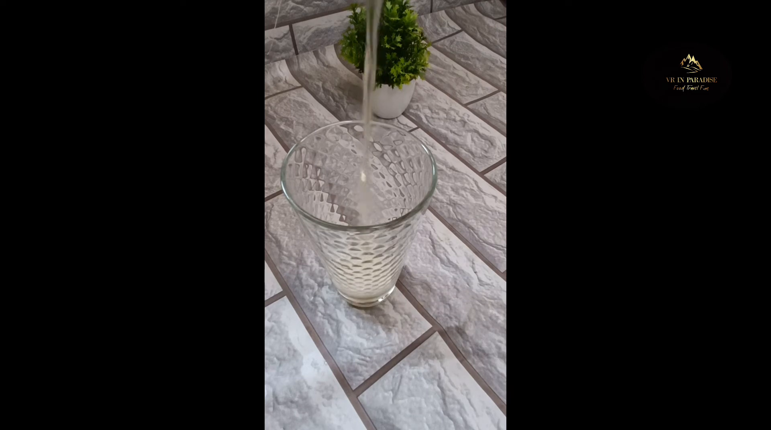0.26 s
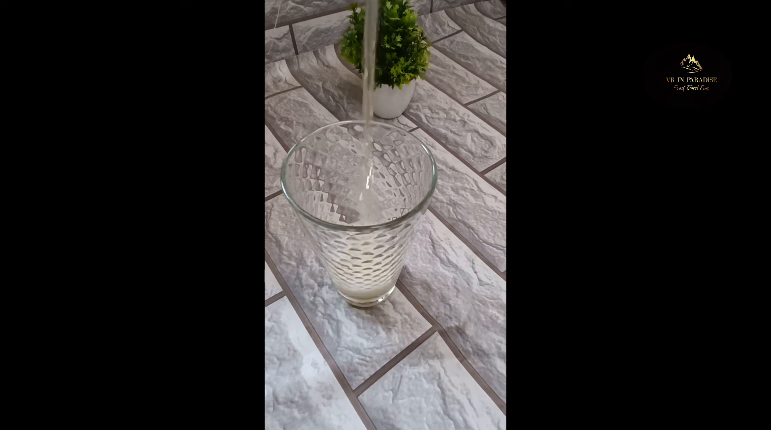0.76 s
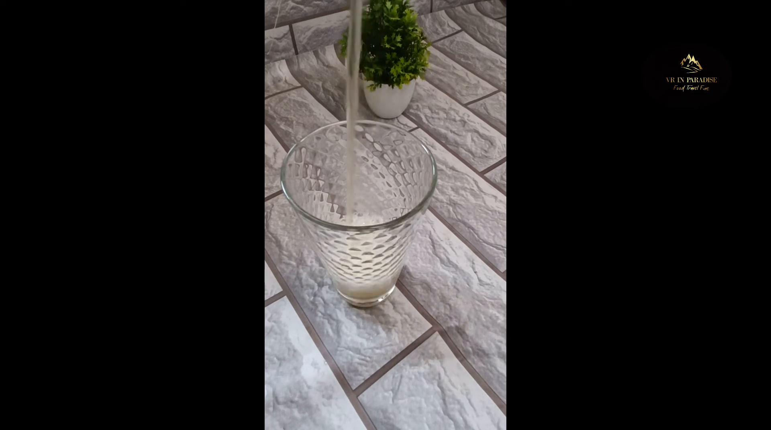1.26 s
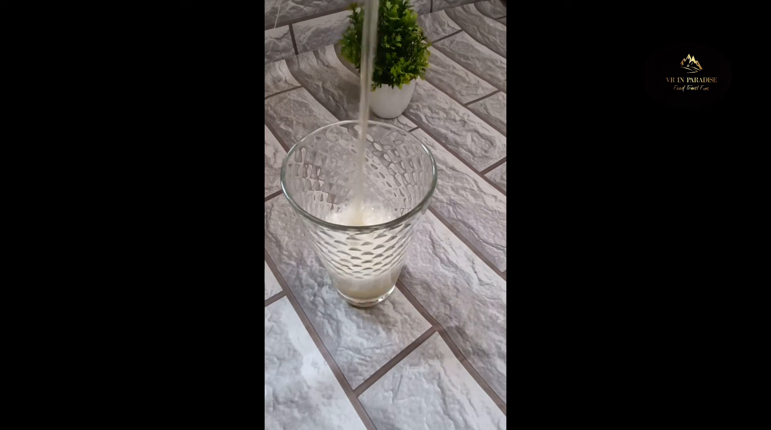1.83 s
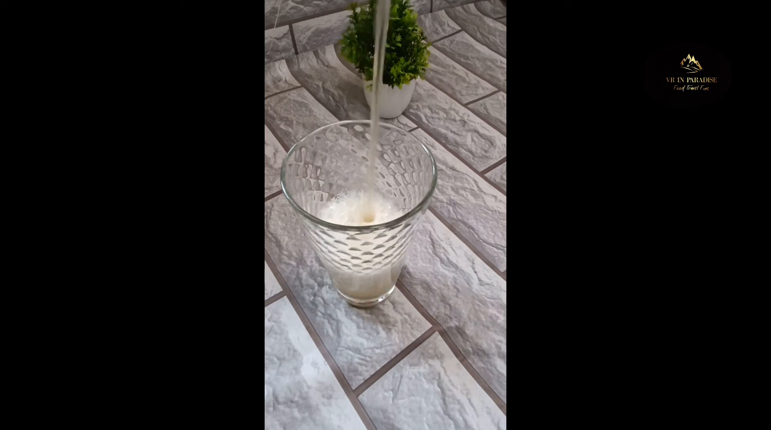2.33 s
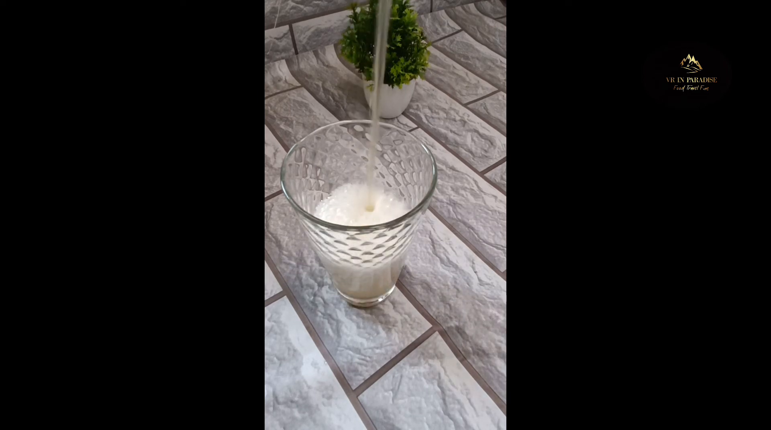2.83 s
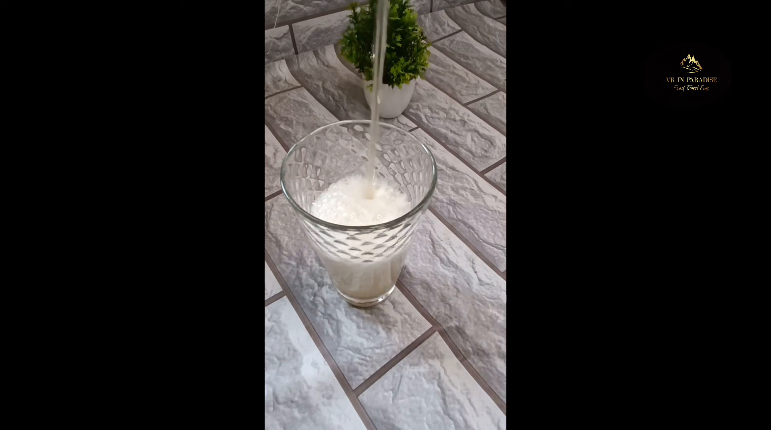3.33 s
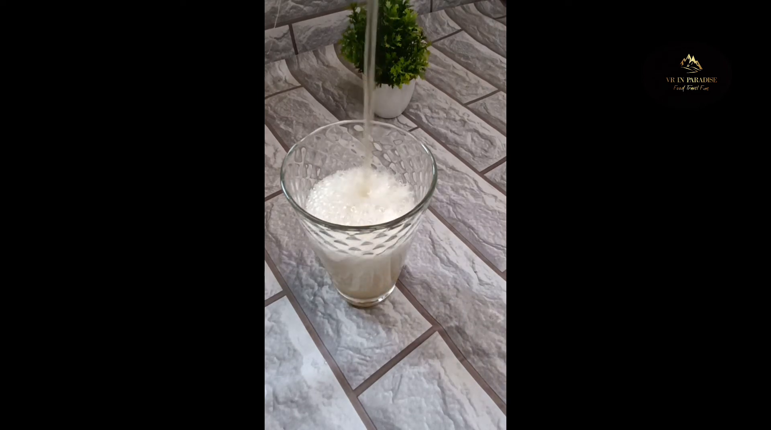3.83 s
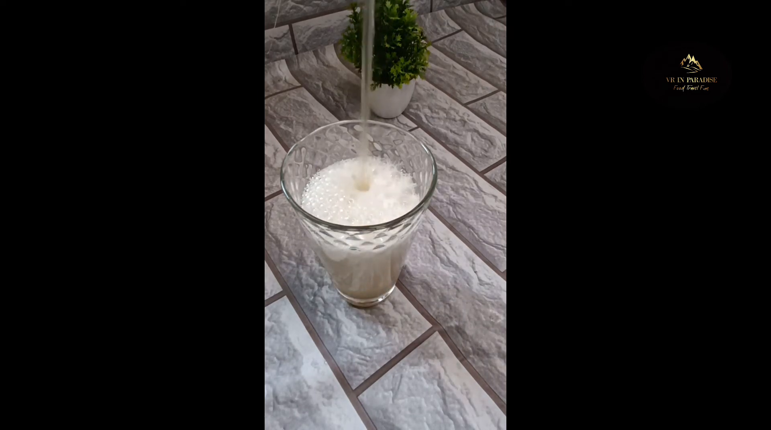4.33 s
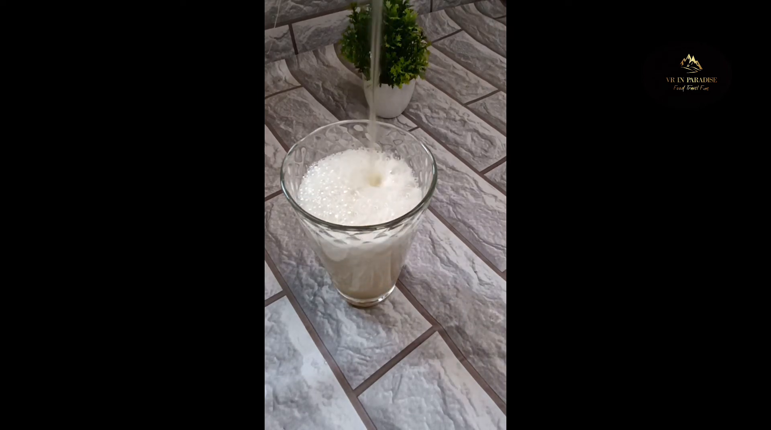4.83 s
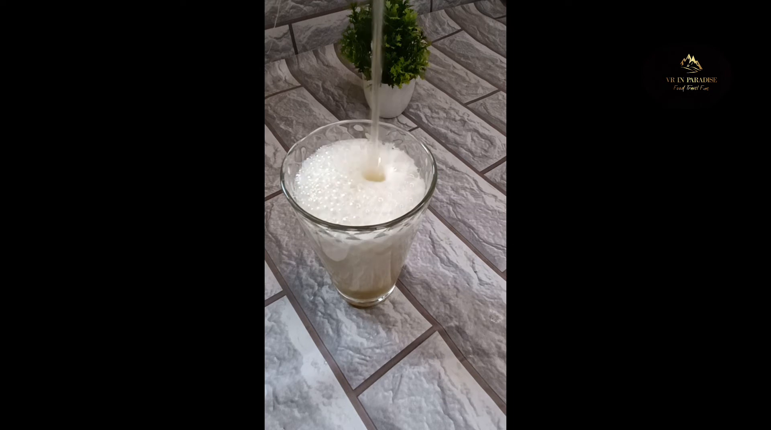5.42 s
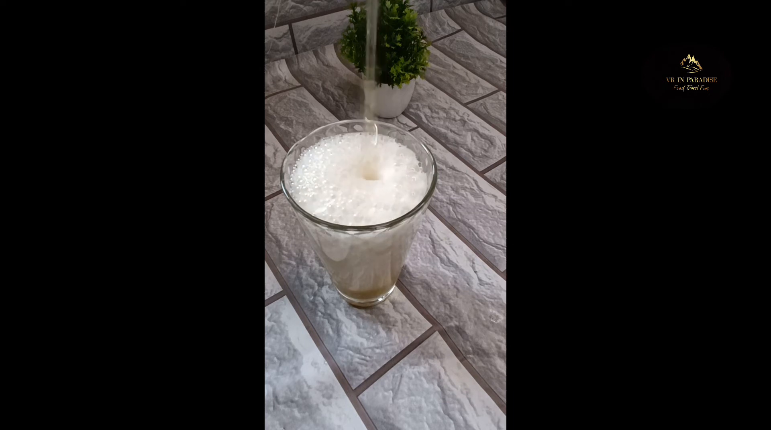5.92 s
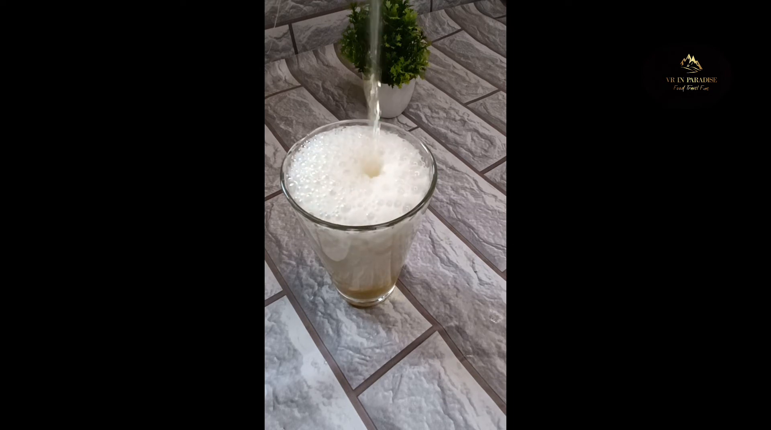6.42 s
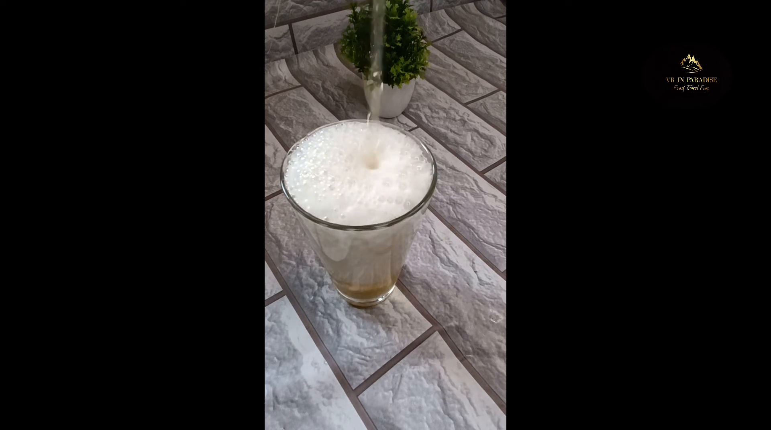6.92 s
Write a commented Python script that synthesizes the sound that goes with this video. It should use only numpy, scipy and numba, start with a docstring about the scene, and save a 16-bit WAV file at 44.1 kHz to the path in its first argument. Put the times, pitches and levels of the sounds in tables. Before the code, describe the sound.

Close phone pickup in a small tiled room: a fizzy drink splashes into a glass, loudest at the start with dense resonant slaps and bright droplets. Over several seconds the hollow tone climbs and blurs, bubbles plink upward, and the spray dulls. After about four seconds foam cushions the stream, so only sparse, quiet plops and a faint dribble remain above low rumble.

```python
"""Wet slaps of a fizzy drink ring out from a glass on a tiled counter, close to a phone with two microphone ports.
Slugs of the broken stream slap the surface and ring the air above it, which climbs for most of the pour;
thuds excite a bubbly liquid that mostly sinks in pitch, and trapped bubbles plink with a rising pitch.
Noise puffs make splash and ticking spray, the growing foam muffles it all, and a faint room rumble lies under."""
import sys
import numpy as np
from scipy import signal
from scipy.fft import rfft, irfft, next_fast_len
from scipy.io import wavfile
from scipy.ndimage import uniform_filter1d, map_coordinates
from numba import njit

SR = 44100
rng = np.random.default_rng(int(sys.argv[2]) if len(sys.argv) > 2 else 0)


def transcribe(u):
    """Save the signal u as a 16-bit wav file named by the first command-line argument.

    u: samples, shape (n,) or (channels, n), limited to [-1, 1]; the rate is SR.
    q: integer samples, one column per channel.
    """
    v = np.clip(np.atleast_2d(u).T, -1, 1)
    q = np.round(v * 32767).astype(np.int16)
    wavfile.write(sys.argv[1], SR, q)


N = 315756

# room noise colour: pitch_hz, level_db
RUMBLE = [(20, -7.5), (48, -21.5), (65, 0.5), (110, -7), (185, -9.5), (285, -20), (330, -11), (470, -24),
          (630, -28), (1100, -22.5), (2500, -26.5), (7000, -44.5), (9000, -30), (16000, -59.5)]
# decay of the tiled room: pitch_hz, t60_s
ROOM = [(200, 0.11), (1500, 0.23), (10000, 0.015)]
# far port against near port, shaded by the phone and the counter: pitch_hz, level_db, phase_radians
FAR = [(100, -2, .1), (520, 0, -.2), (650, 4.5, -.8), (830, -9, -3), (1000, -14, -6), (1150, -12, -9),
       (1450, -2, -12.2), (1750, -6, -12.5), (2000, -2, -12.5), (2300, -8, -13), (2700, -3, -12.7),
       (3200, -10, -12.6), (5200, -7, -12.4), (7000, 7, -12.9), (8500, -5, -12.8), (9300, -15, -13.4),
       (10200, -26, -14), (12000, -10, -13), (16000, 2, -13)]
# dips and lifts at the near port, from the counter's echo: pitch_hz, level_db
NEAR = [(60, -0.5), (150, -4.5), (480, 6.5), (630, 6.5), (850, 4), (1750, 0.5), (1950, -9), (2300, -2.5),
        (2900, -10.5)]
# thin steady stream under the gushes: time_s, patter_db, thud_db, spray_db
STREAM = [(0, -34, -61, -36.5), (.1, -40.5, -59.5, -39.5), (.4, -46.5, -54.5, -43.5), (.8, -43, -48, -40.5),
          (1.1, -43.5, -48, -47.5), (1.45, -48.5, -52.5, -49.5), (2.3, -51, -51.5, -59.5),
          (2.8, -53, -63.5, -65), (3.5, -52.5, -56.5, -54.5), (3.84, -62.5, -69.5, -72),
          (4.22, -73.5, -82, -79.5), (4.45, -67.5, -83.5, -76.5), (4.9, -61.5, -68.5, -66),
          (5.7, -68.5, -76, -72.5), (6.2, -70, -75.5, -72.5), (7.16, -66.5, -71.5, -62.5)]
# a thicker stretch of the stream lands: start_s, length_s (until it drains), lift_db
GUSHES = [(1.352, 0.013, 10), (2.109, 0.061, 6.5), (2.382, 0.18, 5), (2.719, 0.045, 7.5), (2.881, 0.13, 11),
          (3.586, 0.15, 5.5), (3.671, 0.12, 6), (3.856, 0.068, 15), (3.979, 0.043, 6), (4.045, 0.12, 13),
          (4.263, 0.045, 9), (4.327, 0.011, 19.5), (4.474, 0.13, 8), (4.658, 0.045, 10.5),
          (4.756, 0.032, 10), (5.545, 0.06, 8), (5.753, 0.11, 8.5), (6.193, 0.053, 7.5),
          (6.344, 0.069, 5.5), (6.703, 0.035, 8.5), (6.934, 0.032, 2)]
# the filling glass: time_s, air_hz, air_width_hz, liquid_hz, liquid_width_share (of liquid_hz), upper_air_db
FILL = [(0, 830, 99, 610, 0.067, -3.5), (.33, 860, 104, 600, 0.14, 4), (.5, 851, 109, 468, 0.32, 0.5),
        (1.1, 903, 143.3, 329, 0.25, -5), (1.6, 984, 153, 271, 0.26, -13.5),
        (2.2, 1000, 220, 197, 0.3, -11.5), (3, 1160, 428, 178, 0.96, -17), (4, 1544, 710, 183, 0.61, -33),
        (4.7, 2030, 1100, 164, 1.3, -37), (5.8, 2033, 1390, 203, 0.87, -22.5),
        (7.16, 1673, 1320, 190, 0.58, -2.5)]
# glass and counter shaken by the thuds: pitch_hz, width_hz, level_db
COUNTER = [(182.6, 13.6, 10), (250.3, 6.7, -0.5), (334.7, 8.8, 5.5), (450, 81, 1.5)]
# spray colour through the near port, which peaks in the treble: pitch_hz, level_db
SPRAY = [(2500, -27.5), (5000, -12.5), (7000, -23.5), (8300, -0.5), (9500, -0.5), (11000, -12),
         (12500, -15), (14500, -24), (15500, -37)]
# broad splash colour: pitch_hz, level_db
SPLASH = [(300, -22), (620, -21.5), (1000, 1.5), (1500, -2), (2250, -1), (3200, -2.5), (4300, -8),
          (5500, -21), (7000, -32.5), (9500, -14.5), (12500, -37.5), (16000, -64)]
# loud spray ticks: start_s, level_db, finest_droplets_db, biggest_droplets_db (last two against level_db)
TICKS = [(0.0235, -41.5, -6.5, -5), (0.073, -25.5, 1, -13), (0.145, -35.5, -9.5, -2.5),
         (0.165, -35, -15.5, 1), (0.4312, -25.5, -37, -1), (0.545, -36.5, -12, 3), (0.599, -35.5, -14, -2),
         (0.709, -37, -25, -5), (0.753, -42.5, -32.5, 3), (0.863, -40, -28, 3), (0.9322, -36, -31.5, -6.5),
         (0.9887, -36.5, -19.5, -14), (1.0154, -37, -27, -1), (1.1695, -37, -23.5, -17),
         (1.343, -39, -7, 7), (1.9208, -43, 4, -2), (2.1326, -38.5, -11, 12), (2.5429, -38.5, -30, 4),
         (2.852, -48.5, -10, 9.5), (2.918, -55, -5, -4), (2.94, -50.5, -4, 14), (3.014, -55, 1, 13),
         (3.158, -50.5, -11, 3), (3.851, -42.5, -29, -1), (4.058, -48, -7, -14),
         (4.1127, -43.5, -10.5, -15), (4.352, -51, 2.5, -1), (4.4984, -50.5, 0, -8),
         (4.6465, -51.5, -6.5, -3), (4.6817, -47.5, -3.5, -16), (6.011, -62.5, -20, 16.5),
         (6.4223, -55.5, -14, 7.5), (6.7252, -51.5, -7, 5), (6.9407, -53.5, -25, 4)]
# loud slaps: start_s, level_db, thud_db, splash_db (last two against level_db)
SLAPS = [(0.015, -26, -32, -36), (0.028, -14.5, -26, -49), (0.048, -16, -7, -55), (0.093, -20, -32, -40),
         (0.131, -20.5, -40, -34), (0.165, -19, -31, -16), (0.198, -19.5, -8.5, -22),
         (0.287, -25.5, -6, -36), (0.313, -28, -5, -33), (0.362, -25, -6, -44), (0.389, -29.5, -5, -35),
         (0.406, -29, -2, -21), (0.449, -19, -9, -22), (0.474, -26.5, -29, -35), (0.488, -18, -10, -47),
         (0.511, -22, -7.5, -27), (0.544, -23, -10.5, -19.5), (0.657, -19, -9, -50),
         (0.685, -25.5, -6, -10), (0.757, -29, -25, -37), (0.868, -33, -1, -33), (0.885, -24.5, -9.5, -26),
         (0.911, -23.5, -9, -31), (0.93, -40, -11, -15), (0.944, -27, -5.5, -18.5),
         (0.998, -24.5, -17, -27), (1.016, -26, -27, -23), (1.05, -27, -7, -19), (1.081, -25.5, 0, -15),
         (1.107, -22.5, -4.5, -22.5), (1.191, -24, -6, -37), (1.227, -26.5, -24, -17.5),
         (1.288, -37, -15, -27), (1.31, -26.5, -13, -19.5), (1.348, -27, -7.5, -14), (1.376, -21, -35, -27),
         (1.421, -25, -13.5, -23.5), (1.491, -27, -7.5, -22), (1.531, -23.5, -39, -49),
         (1.645, -23, -15, -18), (1.705, -18.5, -40, -26.5), (1.741, -22.5, -19, -30),
         (1.772, -23, -19.5, -24.5), (1.836, -44, -25, -6.5), (1.893, -20, -28, -31.5),
         (1.953, -28, -28, -20.5), (1.977, -26.5, -8, -21), (2.029, -28, -9, -27), (2.069, -29.5, -25, -26),
         (2.131, -27, -34, -15.5), (2.171, -23, -25, -38), (2.243, -24, -5, -63),
         (2.346, -38.5, 8.5, -11.5), (2.429, -29, -36, -18), (2.453, -31, -25, -17.5),
         (2.499, -20, -17, -24.5), (2.751, -35, -48, -11.5), (2.768, -24, -14.5, -39),
         (2.853, -45.5, -25, -8.5), (2.883, -32, -30, -28), (2.905, -30, -23, -27), (2.942, -31, -25, -15),
         (2.984, -21, -50, -24), (3.055, -33, -6.5, -34), (3.125, -28.5, -34, -24),
         (3.221, -28.5, -43, -19), (3.228, -29, -42, -19), (3.244, -28.5, -38, -20.5),
         (3.319, -37.5, -1, -12.5), (3.373, -22, -65, -59), (3.403, -31, -51, -19), (3.554, -43, -24, -15),
         (3.568, -35.5, -20, -18.5), (3.636, -39.5, -2, -15), (3.69, -25.5, -27, -19.5),
         (3.724, -27, -11.5, -27), (3.849, -35, -14, -12.5), (3.854, -33.5, -21, -30),
         (3.899, -25, -37, -35), (3.925, -58, -35, -38), (3.935, -39, -28, -16.5),
         (3.987, -27.5, -21.5, -26.5), (4.091, -49.5, -46, -40), (4.142, -36, -18, -26),
         (4.35, -48, -44, -16.5), (4.498, -31.5, -30, -36), (4.527, -39.5, -19, -22), (4.53, -53, -25, -17),
         (4.553, -50, -2, -14), (4.622, -49.5, -1, -16), (4.681, -30, -22.5, -24), (4.696, -48, -30, -33),
         (4.782, -45.5, -3, -11.5), (4.811, -49, -6, -19), (4.915, -53.5, 0, -13), (5.044, -37, -39, -21.5),
         (5.381, -32.5, -23, -40.5), (5.61, -38.5, -16.5, -27), (5.763, -50.5, -4, -18),
         (6.223, -40.5, -17, -25), (6.24, -48, -12, -15), (6.422, -47.5, -14, -29.5), (6.724, -51, -8, -18)]

LAG_S, TOP_HZ = 8 / SR, 16400  # far port's lag, on top of its phase; the phone's band limit
RUMBLE_TOP_DB, RUMBLE_KNEE_DB, RUMBLE_FOLLOWS = -60.5, -49, 0.5  # share of the patter's drop below the knee
GUSH_ATTACK_S, GUSH_FALL_DB_PER_S = 0.016, 284
THUD_FOLLOWS, SPRAY_FOLLOWS = 1, 1.49  # share of a gush's lift
THUD_LAG_S, SPRAY_FLOOR_DB = 0.008, -79.5  # the liquid answers a gush late; the foam never falls silent
SLUGS_PER_S, SLUG_JITTER = 85, .9  # the stream breaks up at a loose beat; jitter in beats
EVEN, UNEVEN_PER_S2 = .75, .02  # spread of slug sizes at the start, and its growth with time squared
TYPICAL_DB, SMALLEST_ODDS = 9, .07  # the size that keeps its level as the spread grows; bounds the sizes
SCATTER_DB, CHURN_DB = 7, -46.5  # spread in how well a slug rings the air; stirring under the slugs
BURST_DB = 21.5  # every slug throws a burst of spray and splash over the fine drizzle
BUBBLE_DB, BUBBLE_SCATTER = -11.5, .2  # against the air's ring; pitch spread around the air, in log pitch
BUBBLE_RISE, BUBBLE_CYCLES = 0.31, 4  # pitch climb, as a share, over this many cycles
DENT, DENT_S = 0.26, 0.0014  # a slug dents the surface: the air starts this share sharp and settles
UPPER_WIDTH, SLAP_WIDTH = 5, 0.82  # upper air mode against the first; first mode after a loud slap
HUSH_S, HUSH_DB = 0.032, -1  # the stream necks on both sides of a big slug, so the patter drops
AIR_DB, SPLASH_DB, LIQUID_DB, COUNTER_DB = 4, 30, -2, 20.5  # how strongly each part answers a slap
COARSE_DB, FINE_DB = 22.5, 34  # how strongly coarse and big droplets, then the finest, answer a tick


def amp(db):
    """Gain of a level in dB."""
    return 10 ** (np.asarray(db) / 20)


def unit(x):
    """x at rms 1."""
    return x / np.sqrt(np.mean(x ** 2) + 1e-20)


def along(points, hz, column=1):
    """One column of a table over frequency, on a log axis."""
    rows = np.transpose(points)
    return np.interp(np.log(hz + 1), np.log(rows[0] + 1), rows[column])


def curves(rows):
    """One value per sample for each column after the time."""
    s, *cols = np.transpose(rows)
    return [np.interp(np.arange(N) / SR, s, c) for c in cols]


def filtered(x, response):
    """x shaped by a complex response of frequency."""
    m = next_fast_len(N + SR // 2)
    return irfft(rfft(x, m) * response(np.fft.rfftfreq(m, 1 / SR)), m)[..., :N]


def causal(spectrum):
    """The minimum-phase response with this spectrum, which rings only after a blow."""
    def response(hz):
        cepstrum = irfft(np.log(amp(along(spectrum, hz))))
        half = len(cepstrum) // 2
        cepstrum[1:half] *= 2
        cepstrum[half + 1:] = 0
        return np.exp(rfft(cepstrum))
    return response


@njit
def turn(x, step):
    """A spinning, shrinking pointer pushed by x: one moving resonance."""
    out, z = np.zeros(len(x)), 0j
    for i in range(len(x)):
        z = z * step[i] + x[i]
        out[i] = z.real
    return out


def ring(x, hz, width_hz, onset):
    """A moving resonance fed through one of onset times its width, so it swells and has steep skirts."""
    def once(v, width):
        return turn(v, np.exp((2j * hz - np.abs(width)) * np.pi / SR))
    onset_hz = onset * width_hz
    swell = once(x, onset_hz) * 2 * np.pi * onset_hz / SR
    return once(swell, width_hz)


def blows(s, gain):
    """Impulses at the given times."""
    return np.bincount(np.clip(np.round(s * SR).astype(int), 0, N - 1), gain, N)


def spread(x, t60, apart):
    """Each impulse opens a puff of noise that dies in t60; a share of it differs from port to port."""
    t = np.arange(SR // 20) / SR
    common, *own = rng.standard_normal((3, N))
    puffs = signal.fftconvolve(x, amp(-60 * t / t60))[:N]
    return puffs * (common + apart * np.array(own))


def wobble(rate):
    """A smooth random curve, rate knots a second."""
    knots = rng.standard_normal(int(N * rate / SR) + 4)
    return map_coordinates(knots, [np.arange(N) * rate / SR])


def stream():
    """Levels of patter, thud and spray: the steady stream, lifted by gushes that land fast, hold and drain."""
    t, lift_db = np.arange(N) / SR, np.zeros(N)
    for s, length, db in GUSHES:
        attack_db = db * np.clip((t - s) / GUSH_ATTACK_S, 0, 1)
        drain_db = GUSH_FALL_DB_PER_S * np.maximum(t - s - length, 0)
        lift_db = np.maximum(lift_db, attack_db - drain_db)
    late_db = np.interp(t - THUD_LAG_S, t, lift_db)
    patter_db, thud_db, spray_db = curves(STREAM)
    spray_db = np.maximum(spray_db + SPRAY_FOLLOWS * lift_db, SPRAY_FLOOR_DB)
    return patter_db + lift_db, thud_db + THUD_FOLLOWS * late_db, spray_db


def rumble():
    """Room noise with a blurred hum, partly shared by the ports; it sinks when the pouring is faint."""
    def colour(hz):
        hum = 0.8 / (1 + ((hz - 65) / 3) ** 2)
        return amp(along(RUMBLE, hz)) + hum
    common, left, right = filtered(rng.standard_normal((3, N)), colour)
    patter_db = uniform_filter1d(stream()[0], size=SR // 12)
    under_db = np.minimum(patter_db - RUMBLE_KNEE_DB, 0)
    return amp(RUMBLE_TOP_DB + RUMBLE_FOLLOWS * under_db) * unit(common + 0.51 * np.array([left, right]))


def room(x):
    """The tiled walls answer differently at each port, as decaying noise with little bass."""
    hz, t, z = signal.stft(rng.standard_normal((2, SR // 3)), SR, nperseg=256)
    decay = amp(-60 * t / along(ROOM, hz)[:, None])
    bass_cut = (hz ** 2 / (hz ** 2 + 400 ** 2))[:, None]
    tail = signal.istft(z * decay * bass_cut, SR, nperseg=256)[1]
    late = np.pad(x, ((0, 0), (150, 0)))  # samples before the first answer
    return signal.fftconvolve(late, tail / np.linalg.norm(tail[0]), axes=1)[:, :N]


def bubbles(air_hz):
    """Trapped bubbles plink, each on its own pitch, and climb as they die."""
    place, size = rng.random((2, 1200))
    start, t = (place * N).astype(int), np.arange(SR // 40)
    scatter = np.exp(BUBBLE_SCATTER * rng.standard_normal(len(start)))
    hz = (air_hz[start] * (1 - BUBBLE_RISE / 2) * scatter)[:, None]
    age = t * hz / SR / BUBBLE_CYCLES
    tone = np.sin(2 * np.pi * BUBBLE_CYCLES * age * (1 + BUBBLE_RISE * age / 2))
    plinks = size[:, None] ** 3 * age * np.exp(-4 * age) * tone
    return unit(np.bincount((start[:, None] + t).ravel(), plinks.ravel(), N + len(t))[:N])


def spray(coarse, fine, big):
    """Droplets snap as short noise puffs: the finest above the port's treble peak, the biggest below."""
    colour = causal(SPRAY)
    def above(f):
        return 1 / (1 + (11000 / (f + 1)) ** 16)
    def below(f):
        return 1 / (1 + (f / 7000) ** 16)
    middle = filtered(spread(coarse, .007, apart=1.0), lambda f: colour(f) * (1 - above(f) - below(f)))
    dull = filtered(spread(big, 0.012, apart=0.96), lambda f: colour(f) * below(f))
    bright = filtered(spread(fine, 0.0063, apart=1.44), lambda f: colour(f) * above(f))
    return middle + dull + bright


def splash(x):
    """One sharp crack, then a puff of droplets."""
    return filtered(2.2 * x + spread(x, 0.012, apart=0.52), causal(SPLASH))


def counter(f):
    """Response of the glass and counter: a few fixed resonances."""
    return sum(amp(g) * 1j * f * w / (c * c - f * f + 1j * f * w) for c, w, g in COUNTER)


def liquid(x, hz, width_hz):
    """The bubbly liquid thuds at its moving pitch, directly and through the glass and counter."""
    return filtered(ring(x, hz, width_hz, 6.07), lambda f: amp(-6.0) + counter(f))


def dent(s):
    """Pitch factor of the air: each slug dents the surface, so the air jumps sharp and settles."""
    settling = np.exp(-np.arange(SR // 50) / (DENT_S * SR))
    return 1 + DENT * signal.fftconvolve(blows(s, None), settling)[:N]


def air(x, column, width=1, sharp=1):
    """The air column above the liquid rings in a first mode and a wider upper one."""
    hz, width_hz, upper_db = column
    first = ring(x, sharp * hz, width * width_hz, 1.72)
    upper = ring(x, 2.356 * hz, UPPER_WIDTH * width_hz, 0.69)
    return first + amp(upper_db) * upper


def slug_size_db(s, odds):
    """Many small slugs, few big ones: foam swallows the small and lets the big through as time passes."""
    uneven = EVEN + UNEVEN_PER_S2 * s ** 2
    return uneven * (-5 * np.log(odds + SMALLEST_ODDS) - TYPICAL_DB)


def random_patter(column, liquid_hz, liquid_width_hz):
    """Small slugs on a loose beat, with drops scattered at random, drive air, splash, liquid and spray."""
    patter_db, thud_db, spray_db = stream()
    draw = rng.random((1200, 8))
    drop_s = draw[:, 0] * N / SR
    drop_db = slug_size_db(drop_s, draw[:, 1])
    slug = np.arange(SLUGS_PER_S * N // SR)
    slug_s = (slug + SLUG_JITTER * draw[slug, 2]) / SLUGS_PER_S
    slug_db = slug_size_db(slug_s, draw[slug, 1])

    def drops(k, weight, scatter_db):
        return blows(drop_s, amp(weight * drop_db + scatter_db * draw[:, k]))

    def burst(k):
        return blows(slug_s, amp(1.4 * slug_db + BURST_DB - 8.8 * draw[slug, k]))

    small = blows(slug_s, amp(slug_db + SCATTER_DB * draw[slug, 3]))
    small = small + amp(CHURN_DB) * rng.standard_normal(N)
    heavy = drops(3, 1.0, 8.1) + amp(-27) * rng.standard_normal(N)  # over a steady churn
    ringing = unit(air(small, column, sharp=dent(slug_s)))
    splashing = amp(-2.0) * unit(splash(drops(6, 1.0, 25.3) + burst(6)))
    patter = amp(patter_db) * (ringing + splashing + amp(BUBBLE_DB) * bubbles(column[0]))
    thuds = unit(liquid(heavy, liquid_hz, liquid_width_hz)) + amp(-8.5) * unit(filtered(heavy, counter))
    foam = amp(-35)  # foam bursting all the time
    coarse = drops(4, 0.44, 23) + burst(4) + foam
    fine = amp(6.5) * (drops(5, 0.59, 18) + burst(5) + foam)
    big = drops(7, 0.68, 20) + burst(7) + foam
    return patter + amp(thud_db) * thuds + amp(spray_db) * unit(spray(coarse, fine, big))


def hush(s):
    """Gain dip around each loud slap, where the stream necks."""
    necking = uniform_filter1d(blows(s, None) * 1., size=round(HUSH_S * SR)) * HUSH_S * SR
    return amp(HUSH_DB * uniform_filter1d(np.clip(necking, 0, 1), size=SR // 400))


def loud_ticks():
    """Spray droplets that stand out, each a mix of three droplet sizes."""
    s, db, fine, big = np.transpose(TICKS)
    return spray(blows(s, amp(db + COARSE_DB)), blows(s, amp(db + fine + FINE_DB)),
                 blows(s, amp(db + big + COARSE_DB)))


def loud_slaps(column, liquid_hz, liquid_width_hz):
    """Big slugs ring the air, splash, thud in the liquid and shake the counter."""
    s, db, thud_db, splash_db = np.transpose(SLAPS)
    def soft(f):  # the slaps' ringing air is dulled above about 7 kHz
        return 1 / (1 + 1j * f / 7000) ** 2
    ringing = filtered(air(blows(s, amp(db + AIR_DB)), column, SLAP_WIDTH, dent(s)), soft)
    splashing = splash(blows(s, amp(db + splash_db + SPLASH_DB)))
    thuds = blows(s, amp(db + thud_db))
    body = amp(LIQUID_DB) * liquid(thuds, liquid_hz, liquid_width_hz)
    return ringing + splashing + body + amp(COUNTER_DB) * filtered(thuds, counter)


def pour():
    """Patter, loud slaps and ticks share one filling glass, coloured by the counter's echo."""
    air_hz, width_hz, liquid_hz, liquid_width, upper_db = curves(FILL)
    air_hz = air_hz * (1 + 0.033 * wobble(50))  # the surface heaves
    liquid_hz = liquid_hz * (1 + 0.12 * wobble(30))  # the bubble cloud changes size
    glass = (air_hz, width_hz, upper_db), liquid_hz, liquid_width * liquid_hz
    patter = random_patter(*glass) * hush(np.transpose(SLAPS)[0])
    return filtered(patter + loud_slaps(*glass) + loud_ticks(), causal(NEAR))


def scene():
    """Pour, room and rumble at two ports; the far one hears them later and shaded."""
    glass = pour()
    near, far = glass + amp(-12.5) * room(glass) + rumble()
    def shade(hz):
        phase = along(FAR, hz, column=2) - 2 * np.pi * hz * LAG_S
        return amp(along(FAR, hz)) * np.exp(1j * phase)
    return np.array([near, filtered(far, shade)])


def record(dry):
    """The phone keeps nothing above its band limit."""
    return filtered(dry, lambda hz: hz < TOP_HZ)


dry = scene()
out = record(dry)
transcribe(out)
```